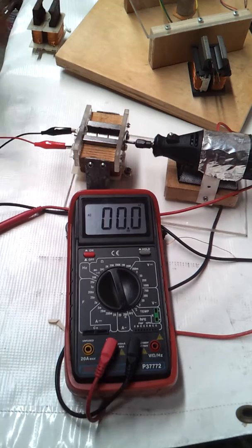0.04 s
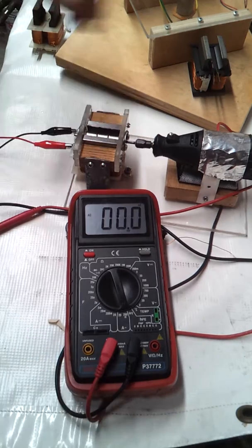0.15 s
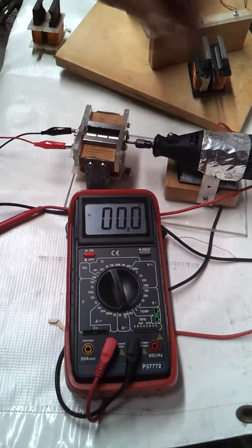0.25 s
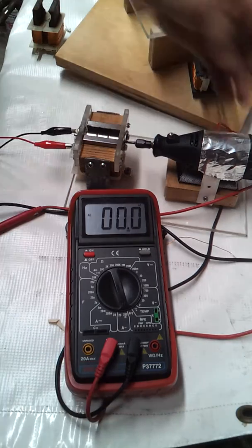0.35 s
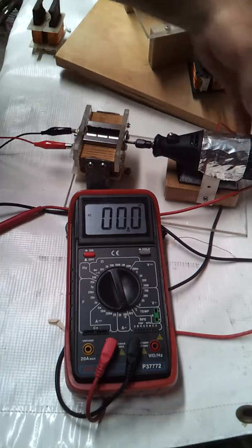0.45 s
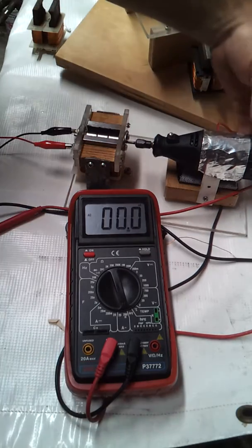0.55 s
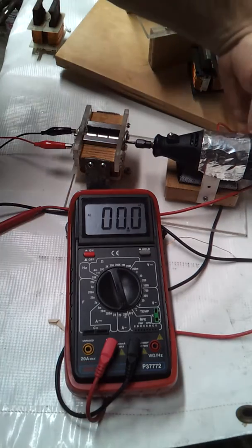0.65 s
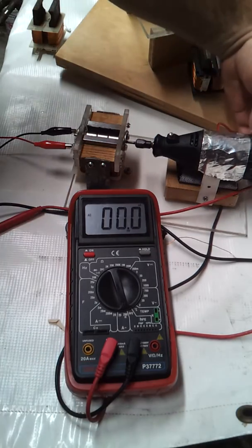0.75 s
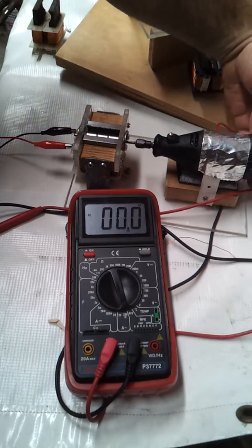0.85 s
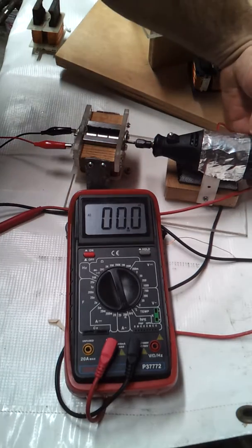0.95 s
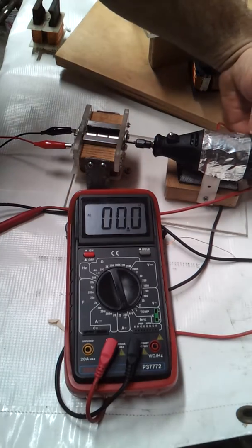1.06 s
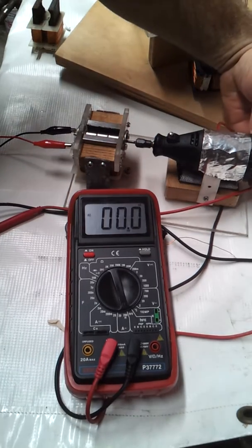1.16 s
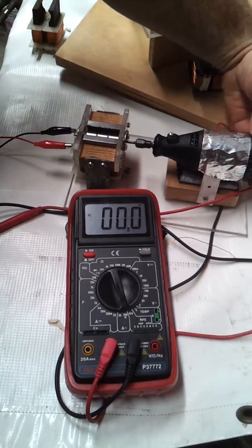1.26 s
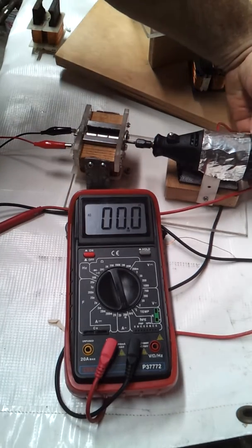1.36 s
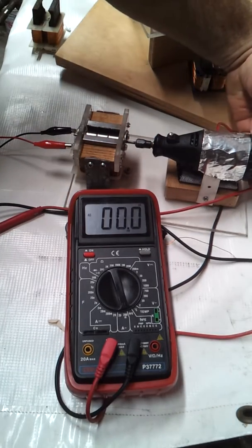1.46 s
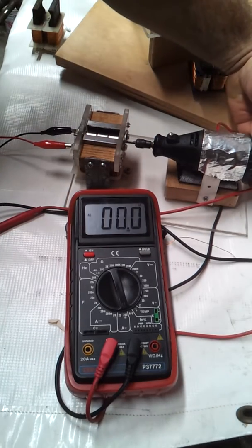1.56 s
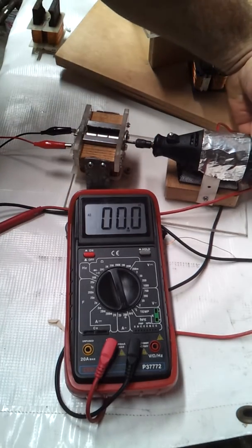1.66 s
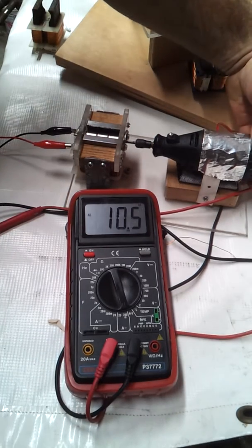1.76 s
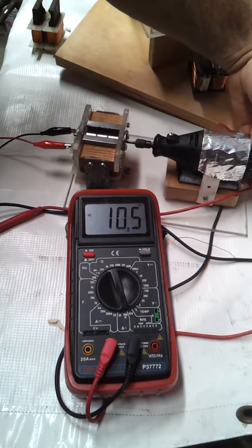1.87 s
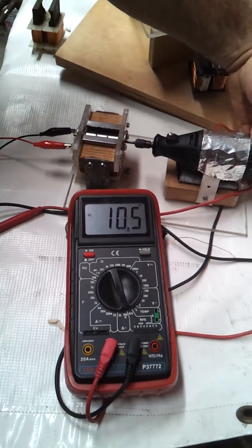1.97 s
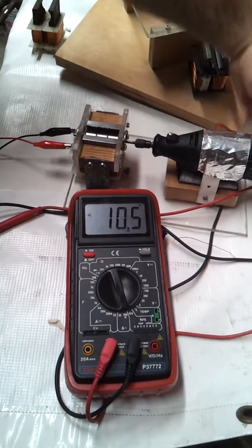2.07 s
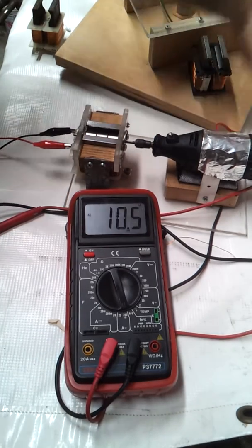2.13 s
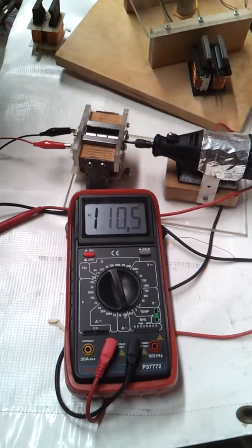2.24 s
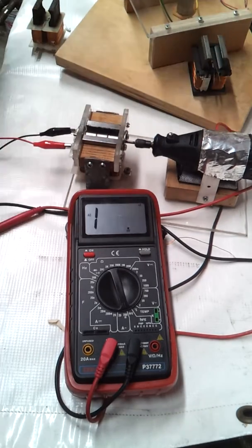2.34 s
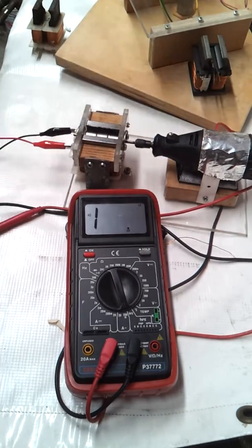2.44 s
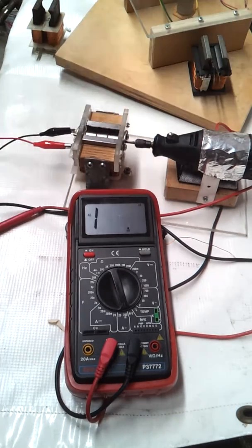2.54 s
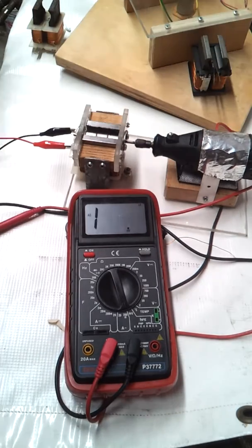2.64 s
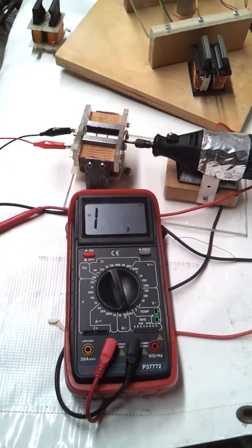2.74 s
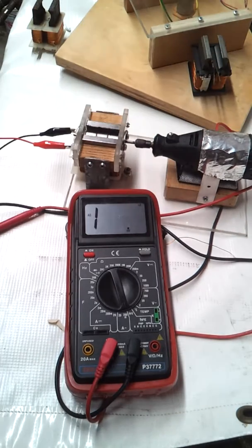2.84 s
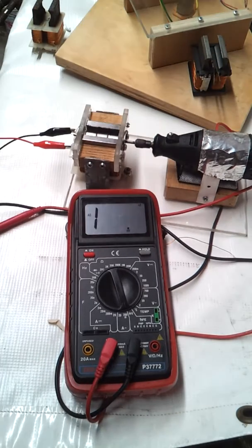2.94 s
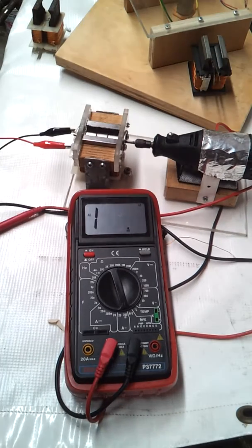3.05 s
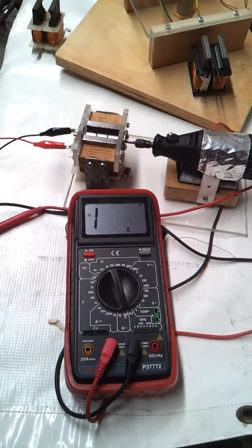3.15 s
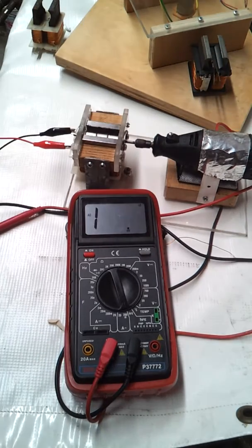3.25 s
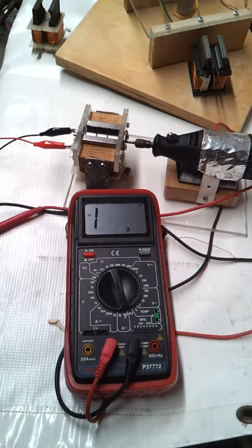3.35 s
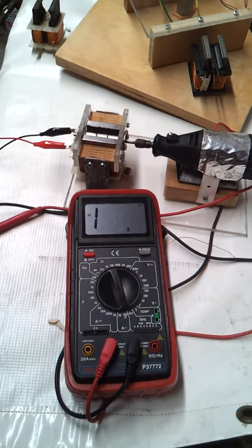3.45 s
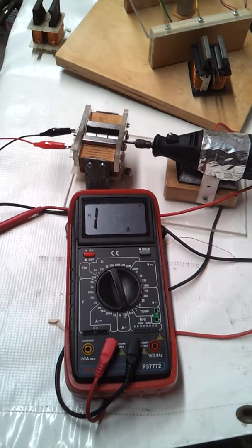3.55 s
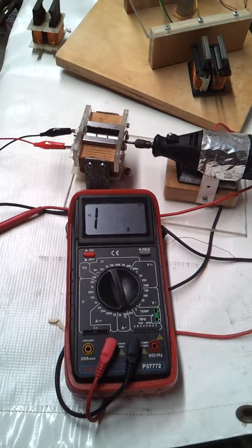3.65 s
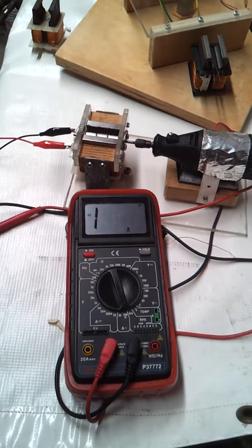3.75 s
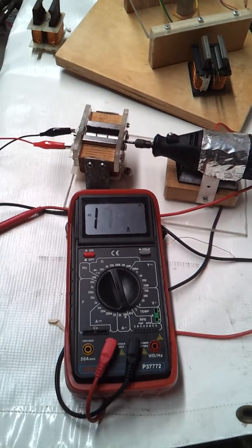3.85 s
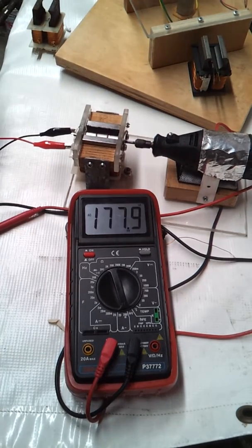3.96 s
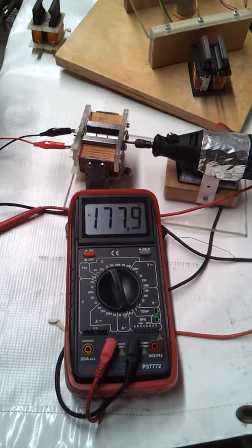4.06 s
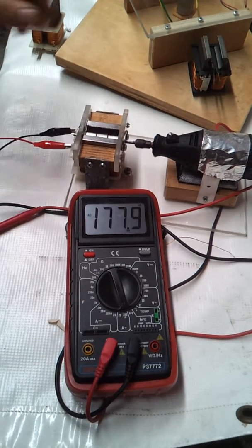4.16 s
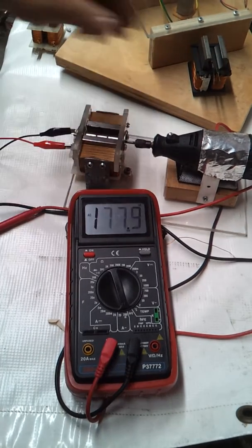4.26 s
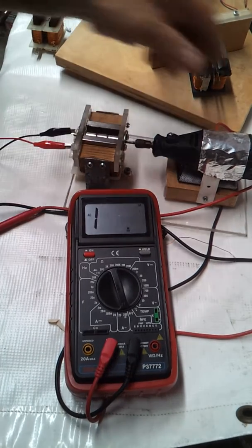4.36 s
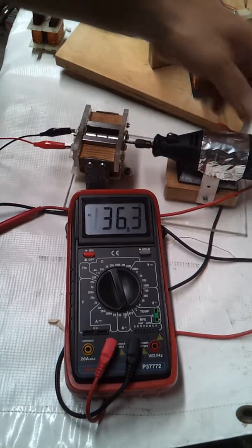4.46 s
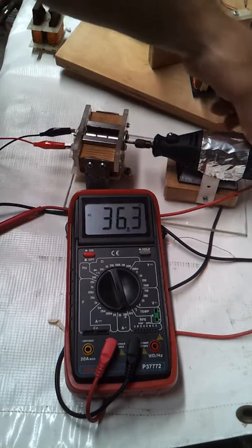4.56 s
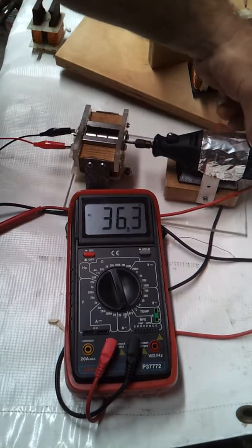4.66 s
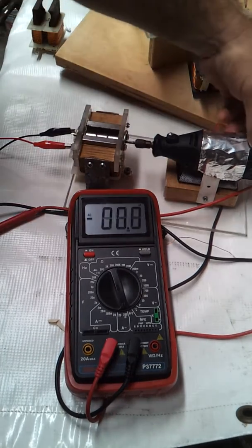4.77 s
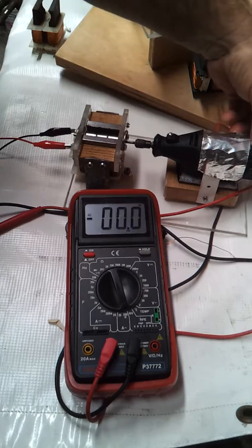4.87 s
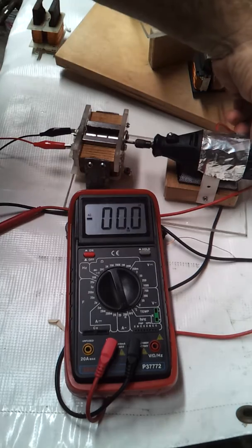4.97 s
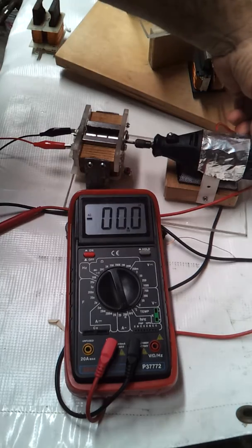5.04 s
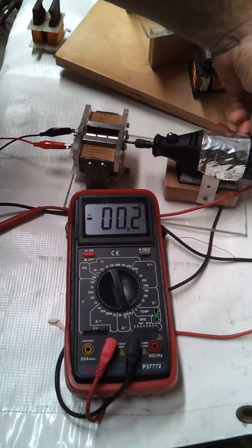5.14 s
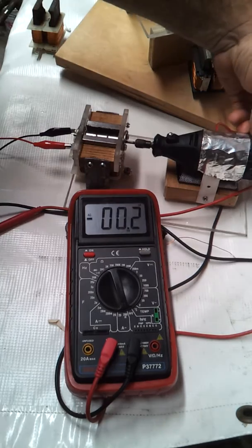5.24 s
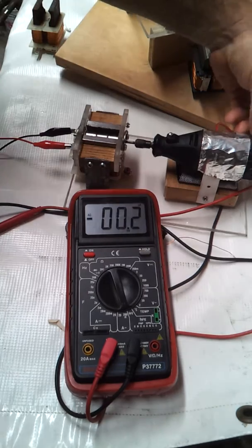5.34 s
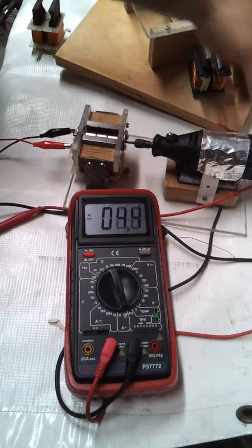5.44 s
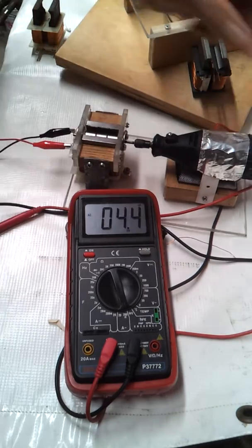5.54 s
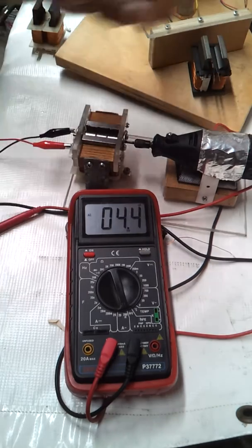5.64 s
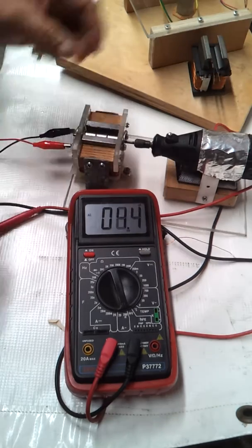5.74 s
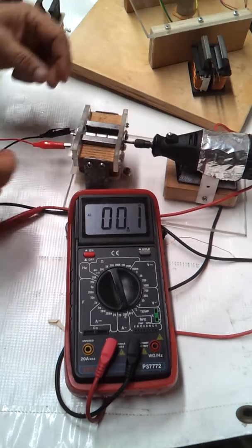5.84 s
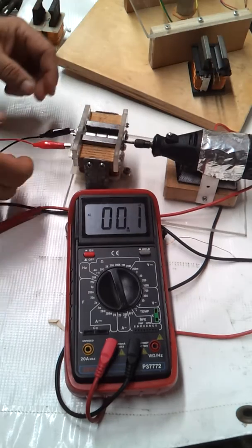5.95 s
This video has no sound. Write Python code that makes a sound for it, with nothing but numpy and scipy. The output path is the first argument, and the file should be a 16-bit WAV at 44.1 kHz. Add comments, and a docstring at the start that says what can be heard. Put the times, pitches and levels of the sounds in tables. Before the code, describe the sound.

A small electric rotary tool turns a homemade generator on a workbench, heard close through a phone microphone. A soft rustle of cloth and a click lead to a short electrical buzz, then a fast rising whine. The motor runs steadily with a hum, a thin whistle and an airy hiss before its pitch falls away. Both speeding up and slowing down, the loose coupling rattles and the bench drones loudly enough to distort.

```python
"""A rotary tool driving a homemade generator

In a quiet workshop a sleeve swishes, a switch clicks and the motor buzzes on mains power. It spins
up, whines with rushing air and a clattering loose coupling (the link to the generator), then coasts
down. On the way up and down, the unbalanced shaft passes through the pitches at which the workbench
likes to ring (its resonances) and shakes it enough to overload a nearby phone's left microphone."""
import sys
import numpy as np
from scipy import signal
from scipy.fft import rfft, irfft
from scipy.io import wavfile
from scipy.ndimage import uniform_filter1d, map_coordinates

SR = 44100
rng = np.random.default_rng(int(sys.argv[2]) if len(sys.argv) > 2 else 0)


def store_pcm(level_fs):
    """Save levels as 16-bit WAV."""
    pcm = np.round(np.clip(level_fs, -1, 1) * 32767).astype(np.int16)
    wavfile.write(sys.argv[1], SR, np.atleast_2d(pcm).T)


N = 264688
TIME = np.arange(N) / SR
START_S = 1.653  # the shaft begins to turn
PULSE_HZ = 120  # pulses of mains current per second
LEFT_LAG_SAMPLES = 15  # sound reaches the left microphone this much later
# Speed that the generator's load allows, in turns per second: time_s, speed_hz
CRUISE = [(2.88, 401.3), (2.918, 404), (3.1, 395.2), (3.378, 404.3), (3.75, 385.2), (3.85, 386),
          (3.882, 379.7), (3.894, 388.8), (3.938, 390.3), (4.116, 386.1), (4.52, 380.1), (4.87, 382.6)]


def undb(db):
    """Turn decibels into a number to multiply by."""
    return 10 ** (np.asarray(db) / 20)


def curves(table):
    """Join a table's timed points with straight lines, one curve per value column."""
    times, *columns = np.transpose(table)
    return [np.interp(TIME, times, column) for column in columns]


def gain_at(hz, points):
    """Look up the gain at a pitch between (pitch_hz, level_db) points."""
    pitches, db = np.transpose(points)
    return undb(np.interp(np.log(np.maximum(hz, 1)), np.log(pitches), db))


def unit(x):
    """Scale a sound to an average (rms) level of 1."""
    return x / np.sqrt(np.mean(x ** 2))


def colour(x, points):
    """Shape a sound's bass and treble with (pitch_hz, level_db) points."""
    return irfft(rfft(x) * gain_at(np.fft.rfftfreq(N, 1 / SR), points), N)


def pan(db):
    """Two gains that make the left side db louder than the right."""
    return undb(np.array([[db], [-db]]) / 2)


def wander(rate_hz):
    """A smooth random curve, mostly between -1 and 1."""
    knots = rng.standard_normal(2048)
    coarse = TIME[::32]
    return np.interp(TIME, coarse, map_coordinates(knots, [coarse * rate_hz], order=3, mode="wrap"))


def resonate(x, hz, width_hz):
    """Ring at one pitch; a narrower width rings longer."""
    return signal.lfilter(*signal.iirpeak(hz, hz / width_hz, SR), x)


def tone(phase, hz):
    """A pure tone at both microphones; hz sets how far the left wave lags."""
    return np.sqrt(2) * np.sin([phase - 2 * np.pi * hz * LEFT_LAG_SAMPLES / SR, phase])


def room(x, echo_db, fade_s):
    """Sound reaches the right microphone first, and the workshop adds a short wash of echoes."""
    # How much louder the left side is at each pitch: pitch_hz, left_minus_right_db
    balance = [(700, 10), (1300, 3.5), (2400, 1), (4400, -0.5), (9000, 4)]
    t = TIME[:SR // 2]
    tail = rng.standard_normal((2, len(t))) * undb(-60 * t / fade_s) * (t > .002)
    response = undb(echo_db) * tail / np.sqrt(np.sum(tail ** 2) / 2)
    response[1, 0] += 1
    response[0, LEFT_LAG_SAMPLES] += 1
    mics = signal.fftconvolve(x[None], response, axes=1)[:, :N] / np.hypot(1, undb(echo_db))
    tilt = np.sqrt(gain_at(np.fft.rfftfreq(N, 1 / SR), balance))
    return irfft(rfft(mics) * np.array([tilt, 1 / tilt]), N)


def workshop():
    """The quiet room: a soft hiss and a wavering low drone."""
    # Tone colour of the room noise: pitch_hz, level_db
    spectrum = [(25, -3.5), (50, -9.5), (100, -8.5), (170, -18.5), (1000, -20), (1300, -24.5), (5000, -28),
                (14400, -30.5)]
    shared = colour(rng.standard_normal(N), [(150, 2.5), (1000, -9.5), (4000, -18.5)])
    hiss = unit(colour(rng.standard_normal((2, N)) + shared, spectrum))
    drone = undb(-51.5) * unit(resonate(rng.standard_normal(N), 99.5, 17))
    return hiss * undb(-45 + .5 * wander(4.4)) + drone


def sleeve():
    """Cloth slides over itself as an arm reaches for the switch."""
    # Swell of the swish: time_s, level_db
    swish = [(.35, -63), (.52, -41), (.61, -31), (.72, -47.5), (.85, -70)]
    # Tone colour of rubbing cloth: pitch_hz, level_db
    cloth = [(200, -15), (1000, -2.5), (1400, -6), (2250, -7), (4000, -19), (9000, -36)]
    swish_db, = curves(swish)
    fibres = rng.standard_normal(N) * undb(1.2 * wander(119))
    return room(unit(colour(fibres, cloth)) * undb(swish_db), echo_db=3.5, fade_s=.16)


def knocks():
    """Each contact makes a short plastic click and a thump in the bench."""
    # Knocks of hand, switch and shaft, before filtering: start_s, click_db, thump_db
    contacts = [(0.933, -57, -54), (1.4, -38.5, -22), (1.452, -44.5, -14), (1.623, -38, -42),
                (1.65, -60, -30), (1.715, -55, -20)]
    clicks, thumps = np.zeros(N), np.zeros(N)
    for start_s, click_db, thump_db in contacts:
        age = np.maximum(TIME - start_s, 0)
        clicks += rng.standard_normal(N) * (age > 0) * undb(click_db - 60 * age / .05)
        thumps += (age > 0) * undb(thump_db - 60 * age / .013)
    clicks = colour(clicks, [(300, 36), (1500, 17.5), (3000, 15.5), (6000, 14), (9000, 6), (14000, -7)])
    thumps = uniform_filter1d(thumps, SR // 400)  # a soft contact pushes for a few milliseconds
    thud = sum(resonate(thumps, pitch, width) for pitch, width in [(85, 38), (235, 26), (325, 15)])
    return room(clicks, echo_db=-2, fade_s=.3) + undb(15) * thud * pan(db=12)


def since(start_s, soft_s):
    """Seconds since a moment, with a rounded start."""
    return soft_s * np.logaddexp(0, (TIME - start_s) / soft_s)


def shaft_speed():
    """Turns per second: speed up, hold what the load allows, then slow by air drag and friction."""
    free_hz, surge_share, surge_s, creep_s = 412.2, .593, .124, .395
    off_s, drag_s, friction_hz_per_s = 4.919, 1.449, 239.5
    age = since(START_S, soft_s=.014)
    quick_surge = surge_share * np.exp(-age / surge_s)
    slow_creep = (1 - surge_share) * np.exp(-age / creep_s)
    cruise_hz, = curves(CRUISE)
    driven_hz = np.minimum(free_hz * (1 - quick_surge - slow_creep), cruise_hz)
    remaining = np.exp(-since(off_s, soft_s=.025) / drag_s)
    return np.maximum(driven_hz * remaining - friction_hz_per_s * drag_s * (1 - remaining), 0)


def effort(hz, db, octave_db, strain_db):
    """A level that gains octave_db as speed doubles, and more as the motor strains at the start."""
    rated_hz, crawl_hz = 390, 24.8  # below a crawl the level stops falling
    rise_s, fall_s = .054, .24
    age = np.maximum(TIME - START_S, 0)
    strain = np.minimum(age / rise_s, 1) * np.exp(-age / fall_s)
    return db + octave_db * np.log2(np.hypot(hz, crawl_hz) / rated_hz) + strain_db * strain


def binding():
    """The coupling binds in spells, boosting the overtones, the metal ring and the mains hum."""
    # Spells and their boosts: start_s, end_s, overtone_db, ring_db, hum_db
    spells = [(2.123, 2.275, 6.5, 3, 0), (2.487, 2.834, 8.5, -9, -1.5), (2.914, 3.403, 12, 20, 7),
              (3.47, 3.614, 11.5, 12, 3.5), (3.699, 3.943, 8, 4, 0.5), (4.05, 4.322, 11, 19.5, 11.5),
              (4.354, 4.878, 9.5, 11, 3.5)]
    ramp_s = .076
    boosts = np.zeros((3, N))
    for start_s, end_s, *boost_db in spells:
        inside = np.clip(.5 + np.minimum(TIME - start_s, end_s - TIME) / ramp_s, 0, 1)
        boosts += np.outer(boost_db, inside)
    return boosts


def bench_boom():
    """The bench's lowest resonance swells as the motor coasts."""
    # Swell of the boom: time_s, level_db
    swell = [(4.9, -46), (5.02, -23), (5.16, -51), (5.44, -32), (5.6, -43)]
    boom_db, = curves(swell)
    coasting = np.clip((TIME - swell[0][0]) / .05, 0, 1)
    return undb(boom_db) * coasting * pan(db=11.5) * tone(2 * np.pi * 93 * TIME + .5 * wander(12), 0)


def mains_buzz():
    """Current pulses buzz in the motor before it turns and fizz at its brushes (sliding contacts)."""
    # Swell of the whole buzz: time_s, level_db
    swell = [(1.39, -5.5), (1.46, 0.5), (1.51, 4), (1.58, 2), (1.74, 2), (1.85, -55.5)]
    # Tones in the buzz: pulse_multiple, level_db
    buzz_tones = [(1, -26), (2, -23.5), (3, -39), (4, -46.5), (5, -47.5), (9, -48.5)]
    # Resonances of the motor's metal: pitch_hz, width_hz, level_db
    motor_rings = [(2630, 120, 0), (3470, 87, 0), (4120, 110, 1), (6170, 150, -2), (8160, 310, -8)]
    pulse = 2 * np.pi * PULSE_HZ * TIME
    buzz = 0
    for k, db in buzz_tones:
        gain = undb(db + .49 * wander(23.6))
        buzz += gain * tone(k * pulse + rng.uniform(0, 2 * np.pi), k * PULSE_HZ)
    sparks = rng.standard_normal((2, N)) * undb(3.2 * np.cos(pulse))
    fizz = unit(colour(sparks, [(1000, 4), (1900, -11), (2600, -3), (4200, -12), (9000, -19)]))
    ringing = unit(sum(undb(db) * resonate(sparks, pitch, width) for pitch, width, db in motor_rings))
    buzz += undb(-40) * fizz + undb(-48.5) * ringing
    swell_db, = curves(swell)
    switched_on = np.clip((TIME - swell[0][0]) / .02, 0, 1)
    return buzz * undb(swell_db - 4) * pan(db=11) * switched_on


def mains_beats(hz, angle):
    """While the power is on, current pulses hum and add tones beside those of the shaft."""
    # Tones of shaft and current mixing: shaft_multiple, pulse_multiple, level_db, left_minus_right_db
    side_tones = [(0, 1, -38.5, 9.5), (1, -1, -32.5, 22.5), (1, 1, -58, 3), (1.998, -1, -41, 0),
                  (2.002, 1, -41, 20.5), (3, -1, -37.5, 17.5)]
    pulse = 2 * np.pi * PULSE_HZ * TIME
    powered, = curves([(1.75, 0), (2.2, 1), (4.92, 1), (5.08, 0)])
    _, _, hum_db = binding()  # a binding motor draws more current
    beats = 0
    for multiple, k, db, pan_db in side_tones:
        phase = round(multiple) * angle + k * pulse + .4 * wander(30)
        boost_db = hum_db * (1 if multiple == 0 else .4)
        gain = undb(db + boost_db - 2.5 + 2 * wander(11))
        beats += gain * pan(pan_db) * tone(phase, multiple * hz + k * PULSE_HZ)
    return beats * powered


def air_and_bearings(hz, angle):
    """Rushing air and rattling bearings throb with the shaft and with the current pulses."""
    # Tone colour of the air: pitch_hz, level_db
    air_spectrum = [(40, -28), (100, -19), (500, -22.5), (1500, -13), (2500, -6.5), (4000, -10.5),
                    (6500, -9), (7500, -15), (9500, -21), (14400, -23)]
    # Tone colour of the bearings: pitch_hz, level_db
    rattle_spectrum = [(40, -31), (100, -15), (550, -11), (800, -8), (1050, -1), (1250, 0), (1500, -15),
                       (3000, -92)]
    boost_db, _, _ = binding()
    air_db = effort(hz, db=-22, octave_db=9.5, strain_db=8)
    rattle_db = effort(hz, db=-25, octave_db=6.5, strain_db=18) + .17 * boost_db
    current = np.cos(2 * np.pi * PULSE_HZ * TIME)
    turning = np.clip(hz / 8, 0, 1)
    throb = undb(2.3 * np.cos(angle) + 1.2 * current + .59 * wander(40))
    grit = rng.standard_normal(N) * undb(2.4 * wander(300))
    air = unit(colour(grit * throb, air_spectrum)) * undb(air_db) * turning
    chatter = rng.standard_normal(N) * undb(.8 * current + 3.1 * np.cos(angle))
    rattle = unit(colour(chatter, rattle_spectrum)) * undb(rattle_db) * turning
    return room(air, echo_db=12, fade_s=.19) + room(rattle, echo_db=-1.5, fade_s=.15)


def coupling_clatter(angle):
    """The loose coupling strikes the generator frame once a turn, never twice alike."""
    # Bursts of clatter (a negative rise is a slow fade): time_s, level_db, rise_db_per_s, fall_db_per_s
    bursts = [(1.73, -22.5, 133, 145), (5.29, -21, 114, 97), (5.68, -32.5, -2.5, 62)]
    # Resonances of the frame: pitch_hz, width_hz, level_db
    frame_rings = [(639, 27, -2), (842, 23, -3), (897, 41, 0.5), (1023, 28, -2.5), (2360, 300, -16)]
    bursts_db = [db - np.maximum(rise * (s - TIME), fall * (TIME - s)) for s, db, rise, fall in bursts]
    whole_turns = np.floor((angle + .08 * wander(120)) / (2 * np.pi))
    strikes = np.diff(whole_turns, prepend=0) * undb(3 * wander(150)) * (angle > 1)
    frame = sum(undb(db) * resonate(strikes, pitch, width) for pitch, width, db in frame_rings)
    return room(unit(frame) * undb(np.max(bursts_db, axis=0)), echo_db=-1, fade_s=.086)


def fan_whistle(hz, angle):
    """The passing fan blades whistle, with a fainter tone an octave higher."""
    # Strength of the whistle: pitch_hz, level_db
    strength = [(3000, -63), (5200, -32), (5900, -47), (6350, -26.5), (6900, -28), (7200, -34.5),
                (7400, -47)]
    blades = 18
    whistle = undb(1.5 * wander(30)) * np.sin(blades * angle)
    octave = undb(-14 + 2 * wander(30)) * np.sin(2 * blades * angle)
    fan = np.sqrt(2) * gain_at(blades * hz, strength) * (whistle + octave)
    return room(fan, echo_db=1.5, fade_s=.092)


def shaft_hum(hz, angle):
    """The shaft hums once a turn, with overtones at two and three times that pitch."""
    # The once-a-turn tone: time_s, level_db, left_minus_right_db
    hum_levels = [(2.2, -22.5, -6), (2.31, -36.5, -28), (2.38, -15.5, -4.5), (2.82, -28.5, -2),
                  (3.03, -18.5, 4), (3.72, -15, -4.5), (3.86, -21.5, -5.5), (4.14, -15.5, 3.5),
                  (4.37, -17, -5), (4.44, -22, -19.5), (4.76, -26, -23), (4.95, -20, 0)]
    # Strength of the two overtones: pitch_hz, level_db
    overtones = [(450, -28.5), (620, -28.5), (760, -29), (810, -27), (870, -23), (960, -23), (1090, -27),
                 (1170, -33)]
    hum_db, pan_db = curves(hum_levels)
    boost_db, _, _ = binding()
    slow_db = 30 * np.log2(np.clip(hz / 345, .01, 1))
    first = undb(hum_db + slow_db + np.array([pan_db, -pan_db]) / 2) * tone(angle, hz)
    wobbly = angle + 1.4 * np.clip(1 - hz / 340, 0, 1) * wander(70)  # a slow shaft wanders loosely
    second = undb(boost_db + 2.03 * wander(14)) * tone(2 * wobbly, 2 * hz)
    third = undb(.26 * boost_db + 6.6 * np.tanh(wander(16))) * tone(3 * wobbly, 3 * hz)
    return first + (gain_at(2 * hz, overtones) * second + gain_at(3 * hz, overtones) * third) * pan(db=9)


def motor_whine(hz, angle):
    """Flickering overtones of the shaft ring the housing and its metal; speeding up hard squeals."""
    # Tone colour of the housing: pitch_hz, level_db
    housing_spectrum = [(1400, -3.5), (1950, -2), (2350, 4), (2750, -2), (3300, -5), (4200, -19),
                        (5500, -22.5)]
    # Tone colour of the metal parts: pitch_hz, level_db
    metal_spectrum = [(2500, -47), (4200, 6), (5700, -0.5), (6800, -4), (8000, -10), (9500, -40),
                      (14500, 4)]
    # Swell of the squeal: time_s, level_db
    squeal_swell = [(1.74, -62), (1.82, -17.5), (1.93, -17.5), (2.08, -49)]
    boost_db, ring_boost_db, _ = binding()
    housing_db = effort(hz, db=-25.5, octave_db=13, strain_db=16) + .29 * boost_db
    metal_db = effort(hz, db=-49, octave_db=4, strain_db=24) + ring_boost_db
    housing, metal = 0, 0
    for k in range(4, 30):
        flicker = undb(5.9 * np.tanh(wander(16)))
        phase = k * angle + rng.uniform(0, 2 * np.pi) + .5 * wander(30)
        overtone = flicker * np.sin(phase) * np.clip(k * hz / 700 - 1, 0, 1)
        housing += gain_at(k * hz, housing_spectrum) * overtone
        metal += gain_at(k * hz, metal_spectrum) * overtone
    squeal_db, = curves(squeal_swell)
    squeal = np.sin(8 * angle + .5 * wander(90)) + undb(-10) * np.sin(17 * angle + .5 * wander(90))
    whine = unit(housing) * undb(housing_db) + unit(metal) * undb(metal_db) + squeal * undb(squeal_db + 1)
    return room(whine * np.clip(hz / 40 - 1, 0, 1), echo_db=-1, fade_s=.25)


def unbalance_db(hz):
    """Shaking grows with speed, then collapses past a critical speed where the rotor centres itself."""
    critical_hz = np.where(TIME < CRUISE[0][0], 359.2, 320.5)  # on the way up, on the way down
    centred = np.clip(.5 + (hz - critical_hz) / 52, 0, 1) ** 2
    dead_spot = np.exp(-((hz - 240.8) / 6.4) ** 2)  # here the mount hardly passes the shaking on
    stuck = np.clip(1 - (TIME - START_S) / .053, 0, 1)  # fades as the shaft breaks free
    return effort(hz, db=2, octave_db=5, strain_db=3) - 26 * centred - 6 * stuck - 17.5 * dead_spot


def bench_shake(hz, angle):
    """The unbalanced shaft pushes the bench once a turn; at low speed it also knocks about loosely."""
    # Resonances of bench and mount: pitch_hz, width_hz, left_db, right_db
    bench_rings = [(95.9, 2.2, -12, 3), (109.7, 5.2, 6, -8), (142, 9.3, -5, -8), (172.5, 38, -1.5, -36),
                   (226.1, 7.1, -0.5, -3.5), (271.3, 41, 4, -61), (310, 56, -8, -12)]
    knocking = sum(k ** -.8 * undb(4.4 * wander(14)) * np.sin(k * angle) for k in range(2, 9))
    jolts = unit(resonate(rng.standard_normal(N), 165, 210))
    slowness = undb(3.8 * np.exp(-hz / 60)) / (1 + (hz / 176) ** 4)
    # the soft mount dulls the higher tones of the knocking
    looseness = colour(slowness * (knocking + undb(-7) * jolts), [(340, -3), (520, -8.5)])
    push = (np.sin(angle) + looseness) * undb(unbalance_db(hz)) * np.minimum(hz / 10, 1)
    return sum(resonate(push, pitch, width) * undb([[left], [right]])
               for pitch, width, left, right in bench_rings)


def scene():
    """Mix it all; the turning parts share one shaft speed (hz) and one shaft angle (radians)."""
    hz = uniform_filter1d(shaft_speed(), SR // 40) * (1 + .001014 * wander(25))
    angle = 2 * np.pi * np.cumsum(hz) / SR
    up_to_speed = np.clip(hz / 110 - 1, 0, 1)
    bench = bench_shake(hz, angle) + bench_boom()
    tones = (shaft_hum(hz, angle) + fan_whistle(hz, angle)) * up_to_speed
    mains = mains_buzz() + mains_beats(hz, angle)
    treble = motor_whine(hz, angle) + air_and_bearings(hz, angle) + coupling_clatter(angle)
    return bench + tones + mains + treble + knocks() + sleeve() + workshop()


def record(dry):
    """The phone flattens peaks that are too loud and cuts the highest treble."""
    top_hz = 14650
    clipped = np.clip(dry, -.98, .98)
    return signal.sosfilt(signal.ellip(10, .2, 70, top_hz, fs=SR, output="sos"), clipped)


dry = scene()
out = record(dry)
store_pcm(out)
```